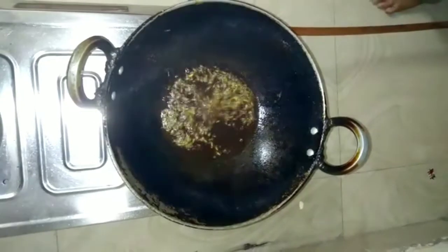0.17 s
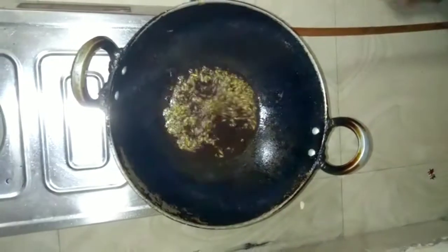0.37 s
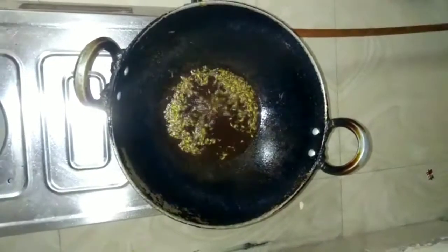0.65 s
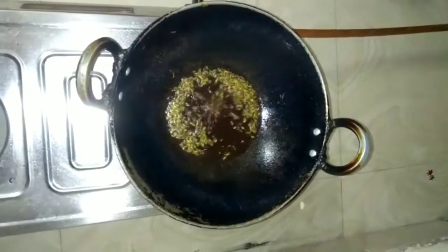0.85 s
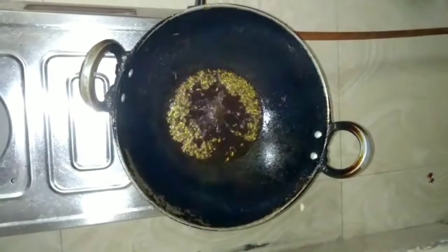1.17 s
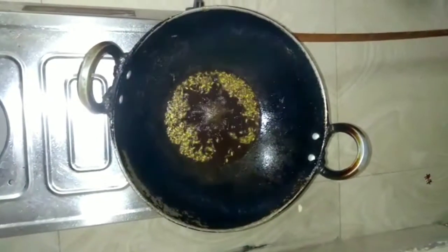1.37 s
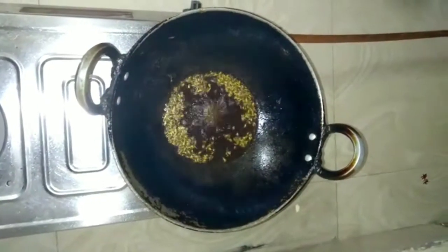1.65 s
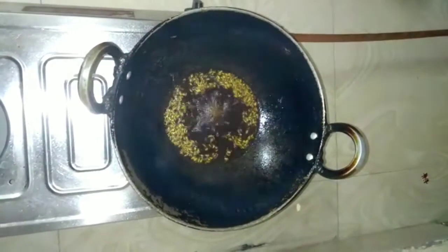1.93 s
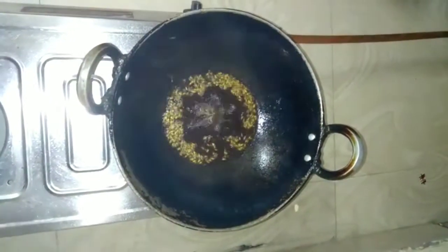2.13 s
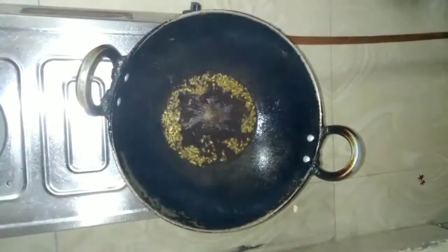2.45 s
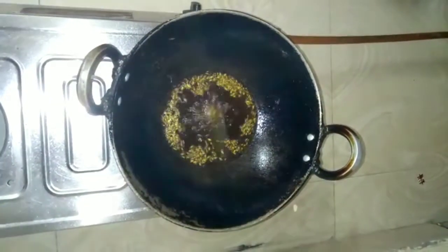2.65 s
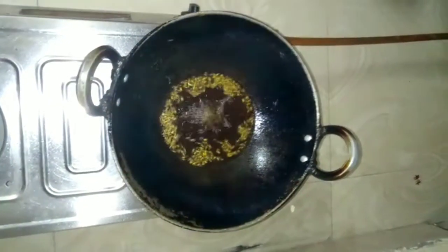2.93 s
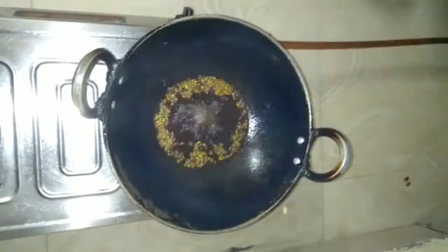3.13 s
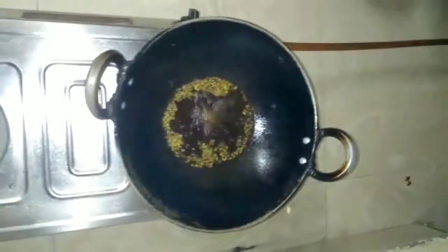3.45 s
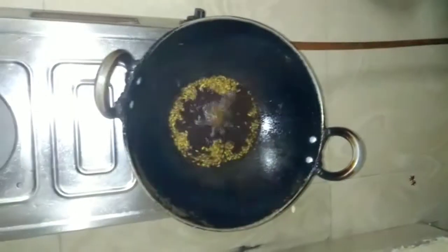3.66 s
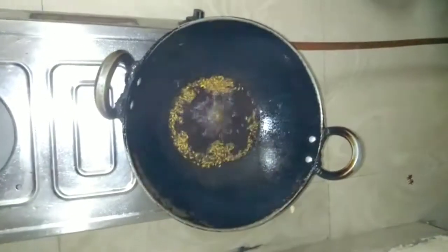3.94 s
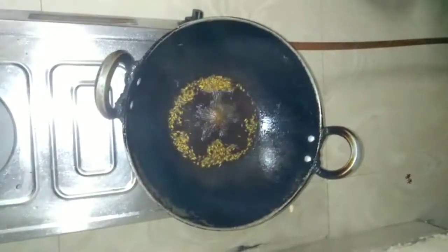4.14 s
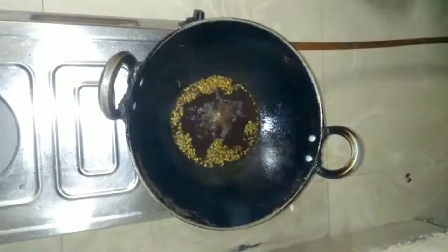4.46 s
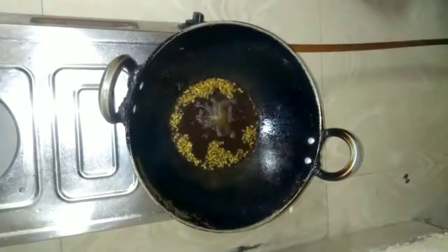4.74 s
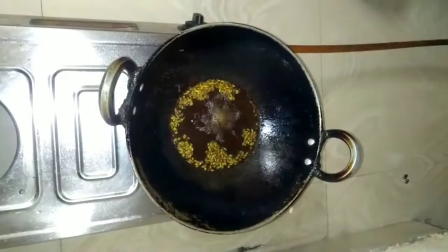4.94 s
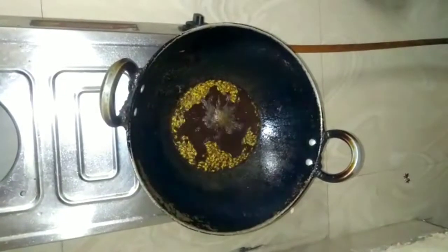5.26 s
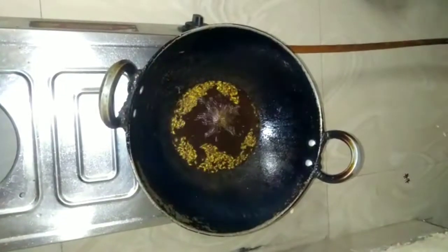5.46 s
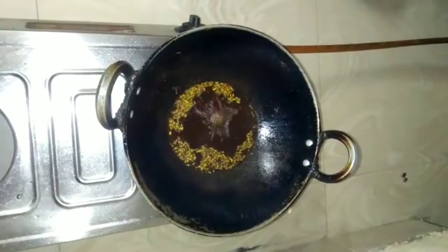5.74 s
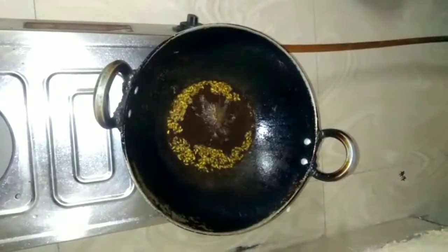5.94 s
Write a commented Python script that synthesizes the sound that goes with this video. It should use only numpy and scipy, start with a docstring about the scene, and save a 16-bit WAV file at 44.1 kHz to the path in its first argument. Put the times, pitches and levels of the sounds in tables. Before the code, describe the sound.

Close above a home stove, oil sizzles vigorously with rapid bright ticks, then drops to a gentler simmer after about a second. Fine dry crackle runs throughout in uneven clusters. A couple of seeds crack at one second; a busier run of woody, hollow pops comes from three to just over four seconds, then only a few. The metal bowl and tiled room add short bright echoes; faint hum and burner rush stay constant, with the frying stronger on the left.

```python
"""A hiss of frying comes first, with crackle, a low hum and soft burner noise, close above a kitchen stove.
Whole seeds fry in hot oil in a round-bottomed pan: fine bubbles merge into the hiss, and larger ones
burst as sharp ringing ticks that the bowl throws back. Now and then a seed cracks dryly or pops with
a hollow ring. The frying calms after the first second; a small tiled kitchen lingers behind it.
Two microphone ports hear the pan, the right one facing away."""
import sys
import numpy as np
from scipy import signal
from scipy.fft import rfft, irfft, next_fast_len
from scipy.io import wavfile
from scipy.ndimage import uniform_filter1d

SR = 44100
rng = np.random.default_rng(int(sys.argv[2]) if len(sys.argv) > 2 else 0)


def waveform_to_disk(signal):
    """Save audio, clipped to [-1, 1], as 16-bit WAV at the path in sys.argv[1]."""
    frames = np.transpose(np.atleast_2d(signal))
    scaled = np.clip(frames, -1, 1) * 32767
    samples = np.round(scaled).astype(np.int16)
    wavfile.write(sys.argv[1], SR, samples)


N = 269010
T = np.arange(N) / SR


def undb(db):
    """Decibels to gain."""
    return 10 ** (np.asarray(db) / 20)


def unit(x):
    """Scale to an energy of one per channel."""
    return x / np.sqrt(np.sum(x ** 2, axis=-1, keepdims=True))


def level(x, db):
    """Scale to an rms level."""
    return x * undb(db) / np.sqrt(np.mean(x ** 2))


def sides(pan_db):
    """Left and right gains, `pan_db` apart, that keep the mean power."""
    gains = undb(np.array([pan_db, -pan_db]) / 2)
    return unit(gains)[:, None] * np.sqrt(2)


def add(out, x, s):
    """Mix x into out from time s on."""
    i = int(np.clip(s * SR, 0, N - 1))
    out[..., i:i + x.shape[-1]] += x[..., :N - i]


def colour(x, points):
    """Filter by a spectrum of (frequency [Hz], gain [dB]) points."""
    hz, db = np.transpose(points)
    size = next_fast_len(N)
    f = np.maximum(np.fft.rfftfreq(size, 1 / SR), 1)
    gain = undb(np.interp(np.log(f), np.log(hz), db))
    return irfft(rfft(x, size) * gain, size)[..., :N]


def walk(rate):
    """Smooth random wandering with an rms of one, from `rate` random steps per second."""
    k = int(SR / rate)
    steps = np.repeat(rng.standard_normal(N // k + 1), k)
    smooth = uniform_filter1d(uniform_filter1d(steps, k), k)
    return level(smooth[:N], 0)


def fade(t, t60):
    """Exponential decay, 60 dB down after t60."""
    return np.exp(-np.log(1000) * t / t60)


def ring(hz, cycles, size, rise=0.75, glide=0):
    """A resonance that swells over about `rise` cycles and is 60 dB down after `cycles`, its pitch rising by `glide`."""
    turns = T[:size] * hz
    sweep = 1 + glide * np.minimum(turns / cycles, 1)
    tone = np.sin(2 * np.pi * np.cumsum(hz * sweep) / SR)
    return unit(tone * (1 - np.exp(-turns / rise)) * fade(turns, cycles))


def splash(t60, size):
    """A dying burst of noise for each side, nearly even in colour."""
    envelope = fade(T[:size], t60)
    rough = rfft(rng.standard_normal((2, size)) * envelope)
    even = irfft(rough / np.abs(rough), size)
    return unit(even * np.sqrt(envelope))


def bowl(x, chance, focus_ms=0.272, lag_ms=0.092):
    """Direct sound plus echoes focused by the pan's bottom and thrown by its wall; paths vary by spot and side."""
    focus_gain, wall_gain, wall_ms, wander = 2.4, .85, .9, .13
    per_ms = -2j * np.pi * np.fft.rfftfreq(x.shape[-1], 1 / SR) / 1000
    spot = np.exp(wander * chance)[:, None]
    bottom = focus_gain * np.exp(per_ms * focus_ms * spot[:2])
    wall = wall_gain * np.exp(per_ms * wall_ms * spot[2:4])
    ports = np.exp(per_ms * lag_ms * np.array([[0], [1]]))  # the right port hears it later
    heard = irfft(rfft(x) * (1 + bottom + wall) * ports, x.shape[-1])
    return heard / np.sqrt(np.sum(heard ** 2) / 2)


def fizzing():
    """How hard the oil fizzes [dB]: moisture boils off in a swell, then simmers; each tick stirs up froth."""
    boil_peak_s, boil_db, boil_rise_s, boil_fall_s = 0.64, 3, 2.8, 0.28
    simmer_db, drying_db_per_s = -47.5, 0.88  # the simmer sinks as the seeds dry
    froth_db, froth_t60_s = -48.5, 0.18  # froth relative to its burst, and its settling time
    since = T - boil_peak_s
    boil = np.exp(-np.abs(since) / np.where(since < 0, boil_rise_s, boil_fall_s))
    power = undb(simmer_db - drying_db_per_s * T + boil_db * boil) ** 2
    settling = fade(T[:SR], froth_t60_s)
    for s, db, *_ in BUBBLE_TICKS:
        add(power, (undb(db + froth_db) * settling) ** 2, s)
    return 10 * np.log10(power)


# colour of the hiss of the finest bubbles: (frequency [Hz], relative level per Hz [dB])
HISS_COLOUR = [(500, -12), (1500, -7), (3000, -3), (4800, 2.5), (7500, 9), (9500, 5), (12000, -1),
               (15500, -12)]


def fizz(fizz_db, gain_db=-2.0, pan_db=1.0):
    """The finest bubbles merge into a hiss; each half octave of it comes and goes in its own quick flurries."""
    flurry_db, flurries_per_s = 2.7, 130
    size = next_fast_len(N)
    spectrum = rfft(rng.standard_normal((2, N)), size)
    f = np.maximum(np.fft.rfftfreq(size, 1 / SR), 1000)  # all the bass shares one band
    half_octave = np.round(2 * np.log2(f))
    hiss = np.zeros((2, N))
    for band in np.unique(half_octave):
        noise = irfft(spectrum * (half_octave == band), size)[:, :N]
        hiss += noise * undb(flurry_db * walk(flurries_per_s))
    return level(colour(hiss, HISS_COLOUR), gain_db) * undb(fizz_db) * sides(pan_db)


def crackle(fizz_db, gain_db=-4, pan_db=6, pitch_hz=6600):
    """Many small dry bursts in uneven clusters, each with its own pitch; more of them when the oil fizzes harder."""
    out, count = np.zeros((2, N)), 9000  # candidates, of which luck keeps a few
    per_s, spread_db, ceiling_db, pitch_spread, cycles, snap = 110, 6.5, 11, .36, 9, .3
    activity = undb(fizz_db - np.mean(fizz_db) + 4 * walk(35))
    draws = np.c_[rng.random((count, 3)), rng.standard_normal((count, 5))]
    for when, luck, strength, *chance in draws:
        if luck < per_s * T[-1] / count * activity[int(when * N)]:
            hz = np.clip(pitch_hz * np.exp(pitch_spread * chance[4]), 2500, SR / 3)
            burst = ring(hz, cycles, size=256, rise=0.19)
            burst[0] += snap
            db = min(-spread_db * np.log(1 - strength), ceiling_db)
            add(out, bowl(burst, np.array(chance)) * undb(db), when * T[-1])
    out = colour(out, [(300, -14), (2000, 0.0), (7000, 5.0), (14000, 4.0)])
    # loudness follows the fizz by half, since the number of bursts follows it too
    return level(out, gain_db) * undb((fizz_db + np.mean(fizz_db)) / 2) * sides(pan_db)


def rattle(x):
    """Sound rattles round the pan, mostly treble, and is 60 dB down after 32 ms."""
    t = T[:SR // 2]
    echoes = unit(rng.standard_normal((2, len(t))) * fade(t, .032) * (t > .001))
    return colour(signal.fftconvolve(x, echoes, axes=1)[:, :N], [(1000, -1), (2500, 4)])


def kitchen(x, room_t60=0.42, room_db=-10):
    """Diffuse echoes linger between the tiles, starting 6 ms late."""
    t = T[:SR // 2]
    echoes = unit(rng.standard_normal((2, len(t))) * fade(t, room_t60) * (t > .006))
    tail = signal.fftconvolve(x[:1] + x[1:], echoes / 2, axes=1)[:, :N]
    tail = colour(tail, [(300, 18), (900, 2.5), (2600, 5.0), (4200, 2.0), (5800, 4.5),
                         (8000, 4.5), (14000, -1.0)])
    return undb(room_db) * tail


# motor and mains hum: (frequency [Hz], rms level about which it wavers [dB])
HUM_TONES = [(68.7, -62.5), (82.4, -54), (123.8, -66), (137.5, -70.5), (164.8, -57.5), (247.2, -72.5),
             (271, -71)]


def hum(pan_db=-0.3):
    """Steady low tones of a running appliance, each wavering a little in level."""
    waver_db = .5
    tones = np.zeros(N)
    for hz, db in HUM_TONES:
        gain = undb(db + waver_db * walk(4.68))
        tones += gain * np.sin(2 * np.pi * (hz * T + rng.random()))
    return np.sqrt(2) * tones * sides(pan_db)


# colour of the burner and the room: (frequency [Hz], relative level per Hz [dB])
BURNER_COLOUR = [(20, -5), (50, -6.5), (85, 7), (105, -3.5), (135, 3.5), (210, -3), (268, 0.5), (300, -8),
                 (480, -7.5), (850, -9.5), (1400, -16), (3000, -19.5), (12000, -87)]


def rush(apart_hz=650, rush_db=-53):
    """Soft burner and room noise; its bass is more alike on both sides than its treble."""
    mid, side = rng.standard_normal((2, N))
    side = colour(side, [(30, -7), (90, -12), (apart_hz, -4), (2000, -1)])
    both = mid + side * np.array([[1], [-1]])
    return level(colour(both, BURNER_COLOUR), rush_db)


# the most distinct steam bubbles bursting at the surface: (time [s], relative energy [dB],
# pitch [Hz], left minus right of the ring [dB], snap relative to the usual snap [dB])
BUBBLE_TICKS = [(0.0407, -8.5, 6000, 7, -6), (0.0942, -12.5, 7800, 22, 5), (0.099, -10.5, 7160, 12, -1),
                (0.1614, 1.5, 7660, 7, 1.5), (0.2434, -15, 3230, 7, -4), (0.247, 1.5, 6300, 32, -13),
                (0.287, -0.5, 7100, 2, -6), (0.31, -18, 3320, 19, 0), (0.3519, -7.5, 5990, -3, 2),
                (0.36, -1.5, 6800, 18, 5), (0.3777, -4.5, 7800, 20, -4), (0.4175, -14, 7150, 13, 1),
                (0.4255, -10, 5800, 13, -4), (0.4279, -1, 8200, 10, 6.5), (0.4345, -1.5, 6200, 4, -6),
                (0.4406, -1, 6960, 11, 2), (0.455, -8, 6200, 13, -3), (0.505, -10, 6100, 20, -12),
                (0.524, -1.5, 8300, 9, 2), (0.5348, -14, 6800, 14, -5), (0.5414, -6.5, 6640, 18, -6),
                (0.566, -9.5, 7050, 9, -6), (0.5714, -8, 7550, 11, 5), (0.579, -7.5, 7220, 18, 0),
                (0.615, -22, 7500, 10, -2), (0.6441, -2, 6100, 4, -17), (0.6638, -4, 8300, 13, -9),
                (0.6993, -13, 6900, 5, -5), (0.7041, -1.5, 7450, 12, 5), (0.7076, -8.5, 6250, -4, -14),
                (0.7175, -20, 6040, 10, -7), (0.7488, -3.5, 8800, 3, -1), (0.761, -11, 6570, 12, -3),
                (0.8188, -3.5, 6300, 0, 1.5), (0.84, -17, 7400, 12, 3), (0.9245, -12.5, 8150, 9, 3),
                (0.951, -10, 7160, 9, 3), (0.988, -7, 7300, 6, 6), (1.01, -10, 6240, 8, -7),
                (1.177, -10, 8300, 1, 7), (1.2032, -11, 7500, 7, 10), (1.239, 1.5, 7870, 12, 5),
                (1.29, -10, 7400, 3, 8), (1.3366, -19, 6100, 9, 2), (1.3469, 3, 8070, 23, 7.5),
                (1.402, -9, 8230, 6, -4), (1.4152, -4, 6900, 11, 5.5), (1.423, -9.5, 8160, 10, 6),
                (1.4662, -6.5, 8100, 11, -10), (1.6038, -2, 8340, 4, 5), (1.6699, -3.5, 7400, 2, -3),
                (1.8576, -12.5, 6370, 2, 5), (1.914, -10, 7600, 2, -5), (2.0412, -13, 8000, 7, -3),
                (2.127, -14.5, 7350, 0, 6), (2.161, -10, 7700, 6, 8), (2.2698, -10, 5640, 0, -1),
                (2.2795, -17, 7650, 3, -7), (2.306, -14.5, 7580, 1, 9), (2.3234, -14, 8140, 2, -1),
                (2.3906, -13.5, 6200, 2, -8), (2.465, -20, 5800, -2, 21), (2.5767, -11, 6500, 4, 9.5),
                (2.602, -9, 8160, 3, 0), (2.6083, -13.5, 9400, 4, 0), (2.648, -7, 7140, 4, 5),
                (2.657, -5.5, 7800, 3, 9), (2.6982, -15.5, 6100, 0, -9), (2.8658, -14, 6700, 1, 0),
                (2.962, -13, 7500, 9, -10), (3.0289, -11, 5350, 6, -9), (3.0557, -12, 5900, 14, -11),
                (3.078, -8, 4770, 17, -11), (3.0896, -9, 5460, 11, 8), (3.122, -11, 5200, 5, -5),
                (3.2474, -10, 7460, 12, 9), (3.2785, -5.5, 6550, 6, -1), (3.317, -12.5, 8000, 4, 4),
                (3.413, -16.5, 3740, 4, 6), (3.443, -20.5, 4400, 4, 2), (3.639, 0, 6900, 5, 4.5),
                (3.6704, -19, 5940, 16, -4), (3.7735, -15.5, 6340, 3, -2), (3.8286, -10.5, 6660, 1, -3),
                (3.8888, -7.5, 6800, 15, -1), (3.9452, -12, 9600, 6, 17), (3.978, -15, 5500, 4, -3),
                (4.0476, -14, 6000, 1, 3), (4.0568, 4, 7300, 9, 4), (4.1615, -13, 6860, 9, -13),
                (4.2116, -15, 9050, 5, -11), (4.2878, -3.5, 5600, 3, 5), (4.3558, -17, 8000, 7, 2),
                (4.3634, -14.5, 6300, 5, 4), (4.4122, -5.5, 6730, 13, 4), (4.4827, -13.5, 7640, 9, 0),
                (4.5348, -9.5, 6600, 8, 5), (4.6328, -8.5, 7900, 15, 6.5), (4.7213, -9, 8700, 6, 7.5),
                (4.7855, -18, 5630, 5, -11), (4.8498, -20, 7900, 5, 0), (4.8554, -7.5, 8900, 2, 8),
                (4.8684, -7, 7100, 5, -1), (5.0524, -17, 5100, 3, -8), (5.22, -21.5, 7460, 2, 10),
                (5.3326, -8, 7400, 10, 3), (5.4413, -12.5, 7140, 7, 7), (5.4815, -9, 6800, 12, 2),
                (5.4943, -12, 7870, 4, 3), (5.5346, -10.5, 5530, 9, -3), (5.6062, -11, 7600, 8, -1),
                (5.7932, -18.5, 8000, 14, 3), (5.8309, -10.5, 6230, 4, 7.5), (5.8612, -14.5, 6670, 4, 0),
                (5.872, -16.5, 6050, 10, 10), (5.9177, -13, 6600, 2, -19), (5.9525, -10, 5930, 3.5, -7),
                (6.02, -12, 7800, 6, 19), (6.043, -5.5, 5900, 2, -7), (6.0772, -9.5, 6400, 15, -4)]


def ticks(snap=0.33, lead_s=.0003, gain_db=0, spill_cycles=3.66):
    """An oil film snaps and sputters, and the cavity under it rings; gives direct sound and spill to the room."""
    direct, spill = np.zeros((2, 2, N))
    ring_s, rise = .0006, 1.1
    sputter, sputter_t60 = .24, .006
    # larger, lower bubbles spill more into the room: level at the typical pitch, change per octave
    typical_hz, typical_spill_db, spill_db_per_octave = 6820, -2.5, -5
    chances = rng.standard_normal((len(BUBBLE_TICKS), 4))
    for (s, db, hz, pan_db, snap_db), chance in zip(BUBBLE_TICKS, chances):
        burst = ring(hz, ring_s * hz, size=512, rise=rise) * sides(pan_db)
        burst = burst + sputter * splash(sputter_t60, size=512)
        # the snap spreads a little more evenly than the ring
        burst[:, 0] += snap * undb(snap_db) * sides(pan_db * 0.97)[:, 0]
        add(direct, bowl(burst, chance) * undb(db + gain_db), s - lead_s)
        # the room gathers the burst from all directions, so its ring there is set apart and panned less
        spill_db = db + typical_spill_db + spill_db_per_octave * np.log2(hz / typical_hz)
        spilled = ring(hz, spill_cycles, size=512, rise=rise) * sides(pan_db / 2)
        add(spill, spilled * undb(spill_db), s - lead_s)
    # such small bursts radiate little bass
    direct = colour(direct, [(100, -11.5), (500, 1.5), (1100, 2.5), (2000, 5), (3000, 2), (4200, 1.0),
                             (6000, 2.0), (8500, 1.0), (11000, 3.0), (15000, 1.5)])
    spill = colour(spill, [(100, -31), (1000, 4.5), (2500, 4), (4500, 4.0), (6000, 0), (8000, -0.5),
                           (11000, -3.0), (15000, 5.5)])
    return direct, spill


def spray(crack_hz, size, landing_s=.035, pitch_ratio=1.25):
    """Flung droplets land one by one, each spitting at its own pitch."""
    out = np.zeros((2, N))
    pitch_spread, spread_db, cycles = .36, 5, 5
    draws = np.c_[rng.exponential(landing_s, size=24), rng.standard_normal(size=(24, 6))]
    for wait, pitch, strength, *chance in draws:
        hz = min(crack_hz * pitch_ratio * np.exp(pitch_spread * pitch), SR / 3)
        spit = ring(hz, cycles, size=256)
        add(out, bowl(spit, np.array(chance)) * undb(spread_db * strength), wait)
    return unit(out[:, :size])


def husk(crack_hz, overtone_db, crack_db=-1.5, spray_db=-11, click_db=-9, overtone=1.87, snap=0.38):
    """A husk tears with a click and a rough crack in two resonances, then flings droplets."""
    size, husk_t60, crack_cycles = 8192, .014, 5.5
    low = ring(crack_hz, crack_cycles, size=512, rise=1.0)
    high = ring(overtone * crack_hz, overtone * crack_cycles, size=512, rise=1.0)
    body = low - undb(overtone_db) * high
    tear = splash(husk_t60, size)
    tear[:, 0] += snap
    crack = unit(signal.fftconvolve(tear, body[None], axes=1)[:, :size])
    click = splash(0.0036, size) * sides(5.4)
    return undb(crack_db) * crack + undb(click_db) * click + undb(spray_db) * spray(crack_hz, size)


# seeds popping: (time [s], starting ring pitch [Hz], relative ring energy [dB], crack pitch [Hz],
# relative crack level [dB], crack overtone against its main resonance [dB])
SEED_POPS = [(1.036, 857, -14, 3000, -18, -13), (2.343, 860, -8, 2430, -2, -7.5),
             (2.902, 876, -20, 3440, -35, -10), (3.1, 847, -5.5, 2650, -7, -10),
             (3.104, 830, -10, 3000, -2.5, -11), (3.165, 860, -21, 2880, -24, -8),
             (3.253, 850, -13.5, 2450, -19.5, -12), (3.352, 880, -22, 2640, -20, -4),
             (3.502, 863, -11, 3130, -16, -6), (3.793, 1045, -14, 2400, -21, -5),
             (3.863, 894, -6, 3020, -12, -17), (3.864, 900, -20, 2110, -7.5, -28),
             (3.961, 980, -16, 2100, -16, -8), (3.984, 903, -11.5, 2870, -16.5, -6),
             (4.016, 897, -3, 1770, -11.5, -9), (4.248, 930, -15, 2740, -10.5, -6),
             (4.258, 896, -13.5, 3080, -23, -13), (5.021, 890, -18, 2330, -25.5, -18),
             (5.6624, 906, -11, 3100, -6.5, -20), (5.6626, 910, -35, 1800, -11, -20)]
# seeds cracking above the oil, with no hollow ring: (time [s], crack pitch [Hz],
# relative crack level [dB], crack overtone against its main resonance [dB])
SEED_CRACKS = [(0.996, 5000, -9, -13), (1.0136, 4130, -5.5, -25), (3.078, 3320, -5.5, -5),
               (3.418, 3900, -9.5, -9), (5.319, 3350, -13.5, -15)]


def pops(ring_cycles=21, ring_db=1):
    """Seeds split; where the steam they free escapes under the oil, it rings as a larger bubble."""
    out = np.zeros((2, N))
    for s, hz, db, crack_hz, loud_db, overtone_db in SEED_POPS:
        add(out, husk(crack_hz, overtone_db) * undb(loud_db), s)
        hollow = ring(hz, ring_cycles, size=8192, rise=0.93, glide=0.013)
        add(out, hollow * undb(db + ring_db), s)
    for s, crack_hz, loud_db, overtone_db in SEED_CRACKS:
        add(out, husk(crack_hz, overtone_db) * undb(loud_db), s)
    # a seed is too small to radiate bass, and the bowl colours its crack
    out = signal.sosfilt(signal.butter(4, 560, "high", fs=SR, output="sos"), out)
    return colour(out, [(850, -3.5), (1080, -1.5), (1500, 1.0), (1950, 2.0), (2750, 4.0), (3200, 2.5),
                        (3800, -0.5), (5000, 3.0), (8000, 6.5), (12000, -5.0)])


def scene():
    """The frying pan in the kitchen, over hum and burner."""
    fizz_db = fizzing()
    direct, spill = ticks()
    frying = pops() + crackle(fizz_db)
    bubble_rattle_db, seed_rattle_db = -8, -7  # the second also carries the crackle
    in_pan = rattle(undb(bubble_rattle_db) * spill + undb(seed_rattle_db) * frying)
    in_room = kitchen(spill + frying)
    return direct + frying + in_pan + in_room + fizz(fizz_db) + hum() + rush()


def record(dry):
    """The right port faces away and dips around 9 kHz; the microphone clips at full scale and cuts the top."""
    left, right = dry
    right = colour(right, [(5000, 1.5), (7500, -2.5), (9500, -3.0), (13000, 1.5)])
    clipped = np.clip([left, right], -1, 1)
    return signal.sosfilt(signal.ellip(8, .2, 70, 15900, fs=SR, output="sos"), clipped)


dry = scene()
out = record(dry)
waveform_to_disk(out)
```